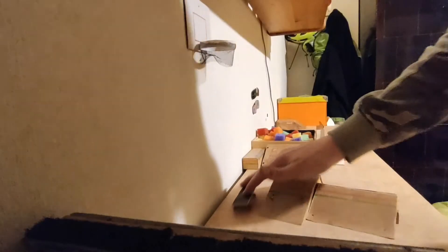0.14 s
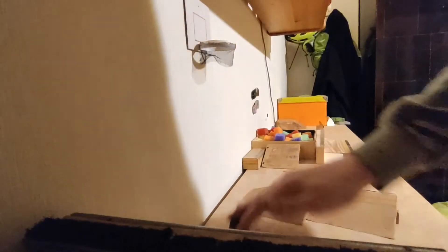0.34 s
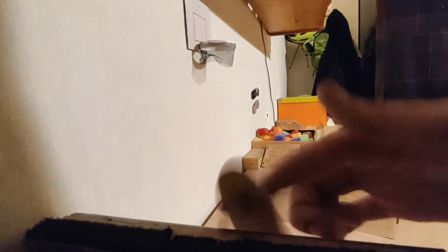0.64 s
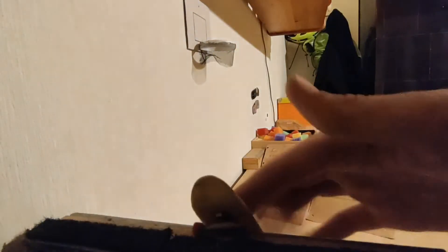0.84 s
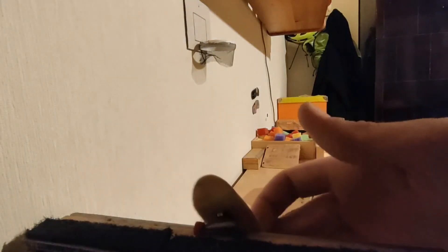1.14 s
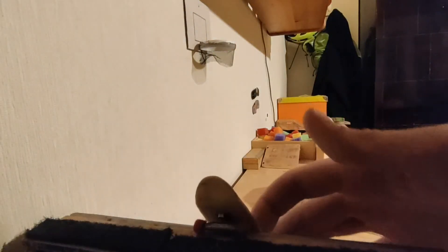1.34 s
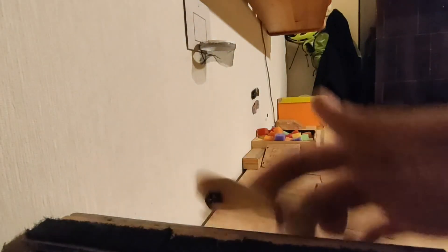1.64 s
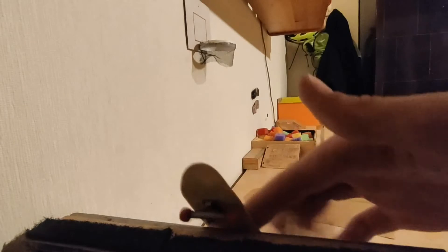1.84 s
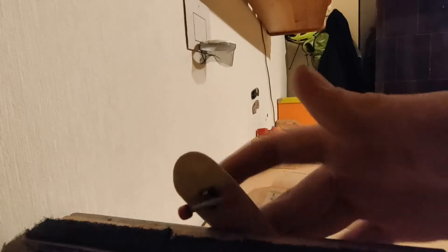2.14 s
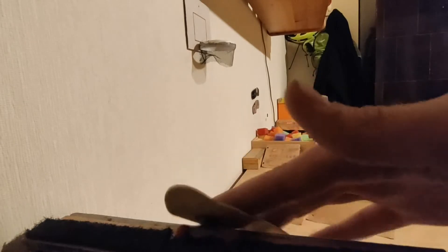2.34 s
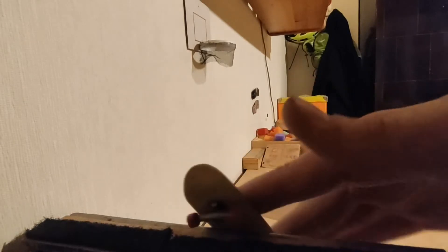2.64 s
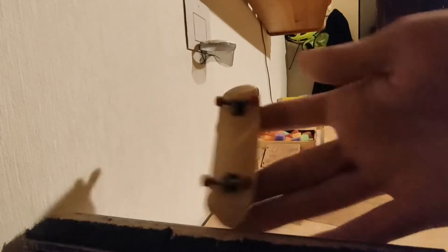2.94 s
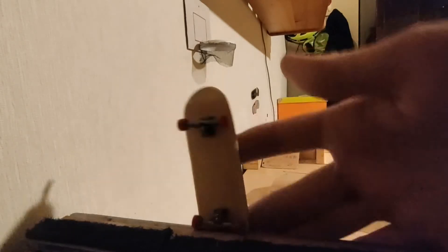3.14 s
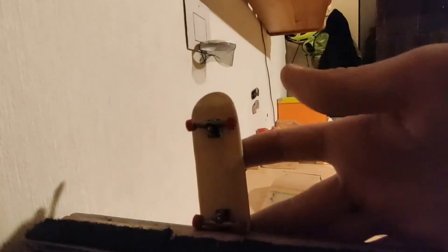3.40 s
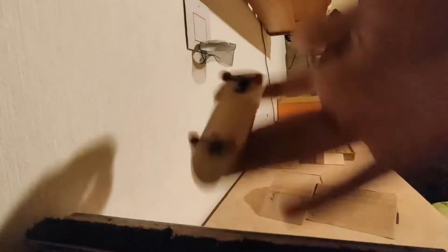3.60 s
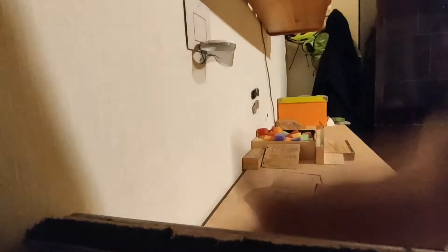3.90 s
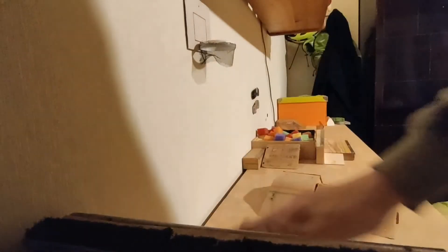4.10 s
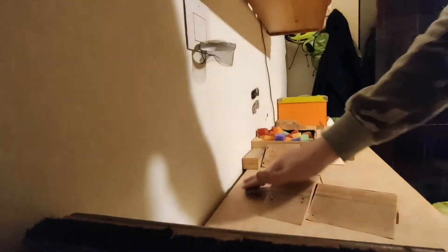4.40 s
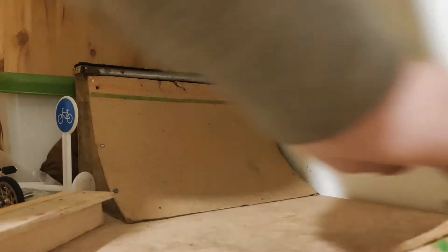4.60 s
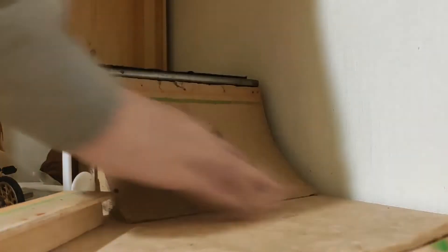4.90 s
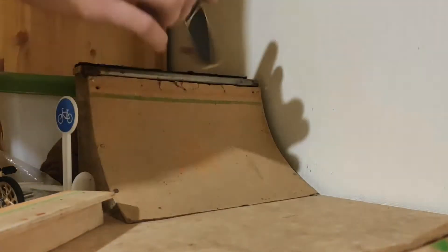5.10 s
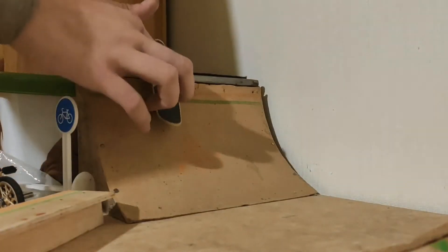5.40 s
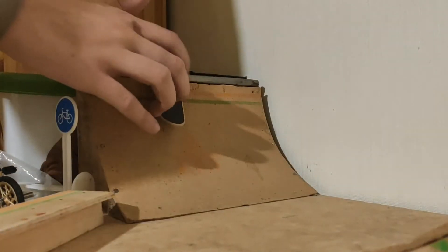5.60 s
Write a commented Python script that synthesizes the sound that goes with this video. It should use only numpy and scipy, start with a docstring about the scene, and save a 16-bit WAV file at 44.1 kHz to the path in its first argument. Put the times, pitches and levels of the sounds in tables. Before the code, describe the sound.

Close and dry in a small room: little wheels swell on wood, a hollow ramp thumps and rings briefly, and hard double knocks land on its edge. A sharp clack with a tiny metallic squeak comes midway, then only faint taps and scuffs. The sound drops out briefly before a second, shorter rolling run and a few woody knocks.

```python
"""First a rattle of small wheels swells on a table: a toy skateboard rolls towards a hollow wooden ramp, runs up,
knocks about on its edge and rolls away; after a fade it rides a second ramp.
Wood sounds by modal resonance under blows, rolling and rubbing; loose metal axles rattle as coloured random
impacts; scrapes squeak as friction noise through narrow resonances. A small room adds delayed reflections, and
two close microphone ports add slow shaking and hiss."""
import sys
import numpy as np
from scipy import signal
from scipy.fft import rfft, irfft, next_fast_len
from scipy.io import wavfile

SR = 44100
rng = np.random.default_rng(int(sys.argv[2]) if len(sys.argv) > 2 else 0)


def store_wav(level_fs):
    """Save 16-bit WAV to argv[1]."""
    pcm = np.round(np.clip(np.atleast_2d(level_fs), -1, 1) * 32767)
    wavfile.write(sys.argv[1], SR, pcm.T.astype(np.int16))


N = 253575

# Gain of the fades: (t/s, gain/1)
FADES = [(0, 0), (0.08, 1), (4.3, 1), (4.56, 0.37), (4.6, 0), (4.65, 1)]
# Shaking of the microphone by the table: (t/s, level/dB)
RUMBLE = [(0, -58), (0.35, -56), (0.93, -58), (2.0, -60), (3.4, -69), (3.96, -78), (4.03, -65.5),
          (4.45, -89.5), (4.62, -68), (4.8, -61), (5.3, -50.5), (5.75, -59)]

# Rolling on the table, one curve a stretch of rolling: (t/s, relative axle drive/dB, relative wood drive/dB)
ROLL_CURVES = [
    [(0, -69, -58.5), (0.1, -54, -52.5), (0.2, -44.5, -45), (0.35, -41, -48), (0.47, -39.5, -40),
     (0.53, -38, -34.5), (0.69, -34.5, -43.5), (0.71, -65.5, -74)],
    [(4.0, -63, -63.5), (4.1, -68, -55.5), (4.17, -57.5, -56.5), (4.25, -68, -69), (4.33, -72.5, -77.5),
     (4.42, -77.5, -89.5), (4.55, -92, -96.5)],
    [(4.6, -59, -60), (4.68, -47.5, -46), (4.77, -40.5, -43.5), (4.83, -47, -47), (4.9, -39.5, -40.5),
     (4.96, -30.5, -36.5), (5.1, -40.5, -38.5), (5.2, -51.5, -67.5), (5.3, -69, -76)],
]
# Rolling drive of the wood at 200 Hz and at 1800 Hz against 600 Hz: (level/dB, level/dB)
ROLL_WOOD_DB = [-8.5, -9]
# Pitches of the table's modes: (f/Hz)
TABLE_HZ = [200, 290, 365, 525, 680, 937, 1200, 1490, 1800, 2480]
# The table's modes: (relative level/dB, t60/s, left-right level/dB, phase by which left lags/rad)
TABLE_MODES = [(-6, 0.03, 1.5, 0.056), (-7.5, 0.025, -3, .2), (2, .05, 0, .3), (0, 0.019, -1.5, 0.043),
               (2, 0.025, 2.5, .2), (-1.5, 0.012, 4.5, 0), (0.5, 0.019, 3, 0), (-2.5, .035, 2, -1.8),
               (-2, .02, 3.5, -2.4), (-6.5, .015, -1.5, -1.5)]
# Left-right balance of the table before and after the fade: (level/dB, level/dB)
TABLE_SIDE_DB = [-5, 7]

# Faint creaking of the held board: (t/s, relative level/dB)
RESTING = [(0.7, -80), (1.6, -77.5), (2.5, -76.5), (3.3, -90), (3.5, -87.5), (3.9, -99), (4.0, -99)]
# Creaking drive of the wood at 200 Hz, at 1800 Hz and of the axles, against 600 Hz: (level/dB, three times)
RESTING_DB = [10.5, 0, -1.5]
# Squeaky scrapes of metal on the ramp's edge: (t/s, half length/s, f/Hz, level/dB)
SQUEAKS = [(1.768, 0.012, 5600, -44), (2.574, 0.014, 6080, -68.5), (2.583, 0.019, 7880, -73.5),
           (2.859, 0.016, 5550, -71.5), (2.858, 0.014, 8130, -74.5), (2.977, 0.013, 5520, -50.5),
           (3.657, 0.012, 5980, -68.5)]
# Scuffs of the deck along the edge: (t/s, half length/s, relative axle drive/dB,
# relative wood drive at 200 Hz/dB, at 600 Hz/dB, at 1800 Hz/dB)
SCUFFS = [(0.777, 0.0019, -18, -15, -20, -38), (0.861, 0.027, -90, -48, -71, -54.5),
          (1.112, 0.044, -67, -44, -56, -70), (1.274, 0.018, -63.5, -43, -55, -57),
          (1.442, 0.01, -69.5, -68, -83, -65), (1.729, 0.014, -46.5, -38, -32.5, -36.5),
          (1.91, 0.022, -71, -49, -56, -52), (2.042, 0.012, -72, -49, -48.5, -62),
          (2.072, 0.018, -62, -53, -73, -76), (2.153, 0.024, -64, -60, -63, -77),
          (2.332, 0.02, -68, -46, -72.5, -79), (2.387, 0.015, -57, -60.5, -60.5, -67),
          (2.582, 0.015, -73.5, -64.5, -66, -72), (2.751, 0.024, -82, -73, -73.5, -77.5),
          (2.867, 0.031, -79.5, -67, -67.5, -80), (2.947, 0.016, -52, -40, -39.5, -50.5),
          (3.115, 0.016, -52.5, -46, -58, -61.5), (3.228, 0.031, -59, -51, -63.5, -69),
          (3.615, 0.018, -77, -64, -67, -80.5), (3.655, 0.012, -63.5, -67.5, -61.5, -67),
          (3.738, 0.021, -69, -91, -92, -80), (4.69, 0.009, -44, -69.5, -61.5, -40),
          (5.365, 0.031, -39, -42, -47.5, -46), (5.43, 0.03, -56.5, -58, -64.5, -52),
          (5.578, 0.049, -59, -50, -51.5, -58), (5.75, 0.025, -67, -63, -59, -71)]
# Lone ticks of the axles: (t/s, relative level/dB)
TICKS = [(0.5292, -9), (0.578, -11.5), (0.606, -36), (0.6325, -29), (1.121, -33), (1.1344, -36),
         (1.1445, -38), (1.1714, -32), (1.294, -35), (1.436, -55), (2.2008, -39.5), (2.21, -42),
         (2.369, -30), (2.376, -28), (2.488, -43), (2.654, -43), (2.939, -37), (2.974, -34), (3.043, -41.5),
         (3.068, -45), (3.105, -39), (3.117, -35), (3.718, -52.5), (3.7414, -42), (3.761, -47),
         (3.927, -41), (3.975, -54.5), (4.121, -60.5), (4.3108, -41), (4.7328, -17.5), (4.7739, -13),
         (4.803, -31), (4.8614, -21.5), (5.0094, -6.5), (5.0915, -19), (5.5616, -53), (5.5932, -60)]
# Colour of the axle rattle: (f/Hz, relative level per Hz/dB)
AXLE_COLOUR = [(1500, -18.5), (2600, -9.5), (3500, -2), (4600, -8.5), (5400, -5), (6500, -2), (7600, -4),
               (8800, -2), (10300, -11.5), (15100, -18.5), (15900, -23), (16500, -58.5)]
# Left-right balance of the rattle at the first and at the second ramp: (level/dB, level/dB)
AXLE_SIDE_DB = [-0.5, 1.5]

# Wheels pressed into a hollow ramp, one curve a run:
# (t/s, relative wood drive at 600 Hz/dB, level at 1800 Hz against it/dB)
RUN_CURVES = [
    [(0.525, -46, 4), (0.545, -27.5, 6.5), (0.57, -14, -4.5), (0.6, -21, -7), (0.635, -18, -6),
     (0.67, -21, 3), (0.69, -40, 1.5), (0.72, -54.5, -1)],
    [(4.005, -45, -9.5), (4.03, -39.5, -8), (4.088, -47, -15), (4.105, -62, -6.5), (4.13, -70.5, -2)],
    [(4.94, -50.5, -1), (4.985, -30, 4), (5.02, -18, -9), (5.05, -16.5, -3.5), (5.08, -19, 0),
     (5.108, -35.5, 10.5), (5.15, -33.5, -2), (5.22, -57, 5.5), (5.28, -65.5, 4)],
]
# One mode of the wood ringing out, under a rolling wheel or after a blow: (t/s, half length/s, f/Hz, level/dB)
SINGS = [(0.561, 0.0047, 1387, -18), (0.58, 0.016, 428, -15), (0.6, 0.0071, 707, -13),
         (0.626, 0.014, 1500, -21.5), (0.643, 0.0071, 700, -9.5), (0.661, 0.0034, 680, -10.5),
         (0.834, 0.014, 199.9, -32), (1.842, .008, 371, -23.5), (1.876, 0.022, 198, -23),
         (2.043, 0.018, 601, -41), (2.284, 0.0049, 649, -50), (2.32, 0.0081, 371, -43),
         (2.957, 0.0091, 580, -35.5), (4.994, 0.0068, 1812, -19), (5.019, 0.0048, 540, -12.5),
         (5.036, 0.003, 600, -6), (5.055, 0.0031, 1280, -8.5), (5.074, 0.0065, 576, -4),
         (5.09, 0.0045, 2050, -15), (5.121, 0.0044, 720, -18.5)]
# Blows on the wood: (t/s, relative axle drive/dB, relative wood drive at 200 Hz/dB, at 600 Hz/dB,
# at 1800 Hz/dB, t60 of the axle chatter/s)
BLOWS = [(0.7068, -7.5, -19.5, -4, -9.5, 0.051), (0.7755, -7, -12.5, -22, -24, 0.065),
         (0.7835, -7.5, -45, -3, -2, 0.028), (0.8053, -26.5, -10, -19, -21, 0.14),
         (0.9798, -66, -39.5, -44, -63, 0.043), (1.062, -11, -9, -12.5, -4.5, 0.031),
         (1.0746, -18, -65, -43, -68, 0.027), (1.2169, -29.5, -26.5, -32, -33, 0.075),
         (1.231, -28.5, -30, -22.5, -34.5, 0.045), (1.261, -35, -44, -36, -53, 0.057),
         (1.3802, -58, -35.5, -51, -58, 0.07), (1.722, -11, -38, -20, -22, 0.02),
         (1.7468, -4.5, -18.5, -13.5, -10.5, 0.023), (1.8193, -9, -19, -11.5, -14.5, 0.098),
         (1.8392, -34, -16, -18, -29, 0.031), (1.8618, -16, -12, -11.5, -12.5, 0.058),
         (1.8787, -61, -22, -49, -25, 0.061), (2.0877, -27, -20, -23.5, -30, 0.022),
         (2.089, -41, -26, -106, -77.5, 0.044), (2.2783, -40, -56, -43, -72, 0.018),
         (2.3101, -32.5, -40, -40.5, -37, 0.022), (2.317, -32.5, -36, -54, -68, 0.025),
         (2.6616, -39.5, -48, -32.5, -30.5, 0.097), (2.6693, -25, -24.5, -31, -34.5, 0.026),
         (2.961, -19.5, -60, -36, -29.5, 0.027), (3.0833, -45.5, -25, -26.5, -38, 0.037),
         (3.1057, -52.5, -39.5, -58.5, -59.5, 0.035), (3.2252, -23.5, -60, -74, -38, 0.041),
         (3.233, -32, -32, -26, -29, 0.039), (3.3798, -65, -45.5, -63, -80.5, 0.039),
         (4.007, -22.5, -31.5, -32.5, -24, 0.035), (4.085, -54.5, -50, -30, -46, 0.032),
         (4.9642, -22.5, -42, -16, -18, 0.018), (5.1185, -8.5, -49, 1, -12.5, 0.027),
         (5.2712, -26.5, -62, -60, -33.5, 0.027), (5.3132, -2.5, -22, -6, -72, 0.062),
         (5.3267, -19.5, -24, -16, -13.5, 0.13), (5.4138, -19.5, -51, -12.5, -27, 0.044),
         (5.4238, -40, -28, -12, -25.5, 0.041), (5.5404, -35, -58, -24.5, -35.5, 0.054),
         (5.6174, -53, -57, -23.5, -34.5, 0.02)]
# Pitches of the two ramps' modes: (f/Hz)
FIRST_HZ = [150, 199, 240, 371, 428, 532, 668, 700, 762, 899, 1155, 1325, 1505, 1680, 1885, 2020, 2330,
            2600, 3100]
SECOND_HZ = [160, 230, 340, 440, 515, 576, 667, 775, 1040, 1293, 1620, 1825, 2015, 2480, 2700, 3130]
# The two ramps' modes: (relative level/dB, t60/s, left-right level/dB, phase by which left lags/rad)
FIRST_RAMP_MODES = [(-13, 0.032, -2.5, 0.5), (0.5, 0.074, -1.5, 0.07), (-4, .05, -6.5, 0.32),
                    (3, 0.038, -3.5, -0.47), (-2, 0.041, -6, 2), (-1.5, 0.036, -6.5, 0.54),
                    (1, 0.023, -7.5, -0.3), (0, 0.024, -7, 0.82), (-12, 0.029, -7, 4), (-7, 0.043, 0.5, -3),
                    (2, 0.065, 0, 2.5), (-3.5, .04, 0, 1.05), (-2, 0.015, 3, -5), (-6, 0.025, -2, 1),
                    (-6, 0.04, 0.5, 1.06), (-10, 0.015, -3.5, 1), (-10.5, .02, -0.5, 0.5),
                    (-4.5, 0.0093, 1.5, -5), (-5, .01, -2.5, 2)]
SECOND_RAMP_MODES = [(-6, 0.11, 10.5, -1), (4, 0.046, 4.5, 0.87), (-7, 0.049, 4, 0.8), (-14, 0.1, -8, 0),
                     (-18, 0.04, 4.5, -3), (0.5, 0.024, 6, -0.6), (-6, 0.037, 17, -1),
                     (-6.5, 0.083, 4, -0.2), (-1, 0.015, 0.5, 5.5), (-7, 0.021, 13, 3),
                     (-4.5, 0.011, -12, 0), (-3, 0.026, 8, 3.5), (0, 0.014, 1, 1.5), (-1, 0.013, 3, 0.84),
                     (-15.5, 0.071, -7, -2), (-16.5, 0.009, -13, -3)]

SECOND_FROM_S = 4.58    # from here the second ramp sounds
HISS_DB, CUTOFF_HZ = -93, 16800
ROOM_T60_S, WALL_CUT_HZ, ROOM_DB = 0.37, 13000, -21
SQUEAK_WIDTH_HZ = 45
TICK_T60_S, TICK_CUT_HZ = 0.015, 8000    # a lone tick is thin
RUN_LOW_DB, RUN_AXLE_DB = -32.5, -25.5    # wood at 200 Hz and axles, against the wood at 600 Hz
SING_SIDE_DB, SING_LAG_RAD = 1.5, 0.32    # left-right level, phase by which left lags
RISE_S = 0.0011
WOOD_BLOW_SHARE = 0.7    # the wood's contact dies in this share of the axle chatter's t60
SETTLE_DB, SETTLE_T60_S = -36, 0.4    # faint, slow shivering of the board after a blow
WOOD_CUT_HZ = 98


def amp(db):
    """The decibel law: level to amplitude ratio."""
    return 10 ** (np.asarray(db) / 20)


def rms_one(x):
    """Normalisation to unit rms."""
    return x / np.sqrt(np.mean(x ** 2) + 1e-20)


def in_time(rows):
    """Linear interpolation of curve columns at every sample."""
    s, *columns = np.transpose(rows)
    t = np.arange(N) / SR
    return np.array([np.interp(t, s, column) for column in columns])


def during(rows):
    """Gating: curve columns and a gate open from the first row to the last."""
    t = np.arange(N) / SR
    return in_time(rows), (t >= rows[0][0]) & (t <= rows[-1][0])


def swell(s, half_s):
    """A Gaussian envelope about one moment."""
    t = np.arange(N) / SR
    return np.exp(-.5 * ((t - s) / half_s) ** 2)


def at_hz(points, hz):
    """Interpolation of a spectrum on a logarithmic frequency axis."""
    f, level_db = np.transpose(points)
    return np.interp(np.log(hz + 1), np.log(f), level_db)


def drift(rate_hz):
    """Low-pass filtered chance: coarse noise through a double pole wanders slowly, with rms 1."""
    step = 32    # samples between coarse values
    r = np.exp(-2 * np.pi * step * rate_hz / SR)
    noise = rng.standard_normal(N // step + 1002)
    slow = signal.lfilter([1], [1, -2 * r, r * r], noise)[1000:]
    return np.interp(np.arange(N) / step, np.arange(len(slow)), rms_one(slow))


def grit(per_s, spread_db):
    """A random impulse process: tiny knocks of uneven size and either sign, with rms 1."""
    sizes = amp(spread_db * np.minimum(rng.exponential(1, N), 5))
    signs = rng.choice([-1, 1], N)
    return rms_one(sizes * signs * (rng.random(N) < per_s / SR))


def burst(t60):
    """Exponential build-up and decay of a contact, with a faint shiver; cut after a quarter second."""
    t = np.arange(SR // 4) / SR
    decay = amp(-60 * t / max(t60, .004))
    shiver = amp(SETTLE_DB - 60 * t / SETTLE_T60_S)
    return (1 - np.exp(-t / RISE_S)) * (decay + shiver)


def sides(balance_db, second):
    """Stereo balance by level difference, split evenly in dB between left and right."""
    return np.where(second, balance_db[1], balance_db[0]) * np.array([[.5], [-.5]])


def hiss():
    """White noise of the microphone, independent at the two ports."""
    return amp(HISS_DB) * rng.standard_normal((2, N))


def rumble():
    """Band-limited vibration: slow shaking, mostly each port's own."""
    band = signal.butter(2, [15, 60], "band", fs=SR, output="sos")
    shake = signal.sosfilt(band, rng.standard_normal((3, N)))
    ports = shake[:2] + 0.8 * shake[2]
    return amp(in_time(RUMBLE)) * rms_one(amp(3.0 * drift(4)) * ports)


def room(x):
    """Recirculating reflection: eight feedback delays a side, duller on every round."""
    size = next_fast_len(N + SR)
    w = 2 * np.pi * np.fft.rfftfreq(size)
    dull = 1 / (1 + 1j * w * SR / (2 * np.pi * WALL_CUT_HZ))
    tail = np.zeros((2, len(w)), complex)
    for k, lag in enumerate(rng.uniform(.006, 0.028, 16) * SR):
        loop = amp(-60 * lag / SR / ROOM_T60_S) * dull * np.exp(-1j * w * round(lag))
        tail[k % 2] += loop / (1 - loop) * (-1) ** (k // 2)
    late = irfft(rfft(x, size) * tail, size)[:, :N]
    # the bass comes straight through the table
    return signal.lfilter(*signal.butter(2, 260, "high", fs=SR), late)


def rolling():
    """Rolling excitation by the table: drive of the wood at 200, 600 and 1800 Hz and of the axles."""
    drive = np.zeros((4, N))
    low_db, high_db = ROLL_WOOD_DB
    for rows in ROLL_CURVES:
        (axle_db, wood_db), on = during(rows)
        drive += on * amp([wood_db + low_db, wood_db, wood_db + high_db, axle_db])
    return drive


def squeaks():
    """Resonant filtering of friction: each squeak is noise swelling through one narrow resonance."""
    out = np.zeros((2, N))
    r = np.exp(-np.pi * SQUEAK_WIDTH_HZ / SR)
    for s, half_s, hz, level_db in SQUEAKS:
        poles = [1, -2 * r * np.cos(2 * np.pi * hz / SR), r * r]
        tone = signal.lfilter([1, 0, -1], poles, rng.standard_normal((2, N)))
        out += amp(level_db) * rms_one(tone) * swell(s, half_s)
    return out


def axles(drive, apart):
    """Filtered random impacts: loose axles and bearings rattle through the deck's broad colour."""
    size = next_fast_len(N + 4096)
    log_gain = np.log(amp(at_hz(AXLE_COLOUR, np.fft.rfftfreq(size, 1 / SR))))
    cepstrum = irfft(log_gain, size)[:size // 2 + 1]
    cepstrum[1:-1] *= 2    # folding makes the colour causal
    colour = np.exp(rfft(cepstrum, size))
    colour /= np.sqrt(np.mean(abs(colour) ** 2))

    def ring(knocks):
        """Convolution of the driven knocks with the colour."""
        return irfft(rfft(knocks * drive, size) * colour, size)[:N]

    shared, own = grit(9000, spread_db=2.0), grit(6000, spread_db=3.5)
    # the second part has opposite sign at the two ports
    return ring(shared) + apart * ring(own) * np.array([[1], [-1]])


def ticks():
    """High-passed short impacts: lone thin ticks of the axles."""
    envelope = np.zeros(N + SR)
    for s, level_db in TICKS:
        envelope[round(s * SR):][:SR // 4] += amp(level_db - 2.5) * burst(TICK_T60_S)
    thin = signal.butter(2, TICK_CUT_HZ, "high", fs=SR, output="sos")
    return signal.sosfilt(thin, axles(envelope[:N], apart=.9))


def patchy(x, spread_db):
    """Independent band modulation: each band of the rattle swells and sinks on its own."""
    edges = [300, 3500, 5500, 7500, 10000, 17000]    # Hz
    out = 0
    for pair in zip(edges, edges[1:]):
        band = signal.sosfilt(signal.butter(2, pair, "band", fs=SR, output="sos"), x)
        out = out + band * amp(spread_db * drift(31))
    return out


def sings():
    """Single-mode ringing: short swelling sine tones of the wood."""
    out, t = np.zeros((2, N)), np.arange(N) / SR
    side = np.array([[.5], [-.5]])
    for (s, half_s, hz, level_db), start in zip(SINGS, rng.random(len(SINGS))):
        tone = np.sin(2 * np.pi * (hz * t + start) - SING_LAG_RAD * side)
        out += amp(level_db + SING_SIDE_DB * side) * tone * swell(s, half_s)
    return out


def rubbing():
    """Sustained contact excitation: drive of the wood at 200, 600 and 1800 Hz and of the axles."""
    drive = np.zeros((4, N))
    for rows in RUN_CURVES:
        (wood_db, bright_db), on = during(rows)
        drive += on * amp([wood_db + RUN_LOW_DB, wood_db, wood_db + bright_db, wood_db + RUN_AXLE_DB])
    (rest_db,), on = during(RESTING)
    low_db, high_db, axle_db = RESTING_DB
    drive += on * amp([rest_db + low_db, rest_db, rest_db + high_db, rest_db + axle_db])
    for s, half_s, axle_db, *wood_db in SCUFFS:
        drive += amp([*wood_db, axle_db])[:, None] * swell(s, half_s)
    return drive


def blows():
    """Impact excitation: a first firm push on the wood, then envelopes of loose chatter."""
    push, loose = np.zeros((3, N)), np.zeros((4, N + SR))
    for s, axle_db, low_db, body_db, high_db, t60 in BLOWS:
        push[:, round((s + RISE_S) * SR)] = amp([low_db + 16.5, body_db + 6.5, high_db + 4])
        span = loose[:, round(s * SR):][:, :SR // 4]
        wood_gain = amp([[low_db - 19.5], [body_db - 4.5], [high_db - 5.5]])
        span[:3] += wood_gain * burst(WOOD_BLOW_SHARE * t60)
        span[3] += amp(axle_db - 9) * burst(t60)
    return push, loose[:, :N]


def wood(push, drive, pitches, modes, per_s=2500, spread_db=3.5):
    """Modal superposition: each mode takes the force at its pitch and reaches each port in its own way."""
    out = 0
    knocks = [grit(per_s, spread_db), grit(per_s, spread_db)]
    for k, (hz, (level_db, t60, lean_db, lag)) in enumerate(zip(pitches, modes)):
        # shares of the forces given at 200, 600 and 1800 Hz
        place = np.interp(np.log(hz), np.log([200, 600, 1800]), [0, 1, 2])
        share = np.maximum(1 - abs(place - np.arange(3)), 0)
        wander = amp(1.5 * drift(9))    # the contact moves over the mode's nodes
        force = (share @ push + share @ drive * knocks[k % 2]) * wander + 1e-18
        # a mode radiates little below its pitch
        force = signal.lfilter(*signal.butter(2, 0.71 * hz, "high", fs=SR), force)
        r = amp(-60 / (max(t60, .005) * SR))
        # the root evens out the level of steady ringing whatever the decay
        gain = amp(level_db - 3.5) * np.sqrt(2 * (1 - r * r))
        phasor = signal.lfilter([gain], [1, -r * np.exp(2j * np.pi * hz / SR)], force)
        half = amp(lean_db / 2) * np.exp(-.5j * lag)
        out = out + np.imag(phasor * np.array([[half], [1 / half]]))
    # small boards radiate no bass
    return signal.sosfilt(signal.butter(4, WOOD_CUT_HZ, "high", fs=SR, output="sos"), out)


def scene():
    """Superposition of both rides near the ports, the room, the shaking table and the hiss."""
    second = np.arange(N) > SECOND_FROM_S * SR
    rolls = rolling() * amp(1.18 * drift(50))    # the table is smoother than the ramps
    table = wood(np.zeros((3, N)), rolls[:3], TABLE_HZ, TABLE_MODES, per_s=6000, spread_db=2.5)
    table = amp(sides(TABLE_SIDE_DB, second)) * table

    push, loose = blows()
    bumps = amp(2.0 * drift(57))    # the wheels bump over the wood's grain
    drive = rubbing() * bumps + loose
    rattle = patchy(axles(drive[3] + rolls[3], apart=0.99) + ticks(), spread_db=3.5)
    rattle = amp(sides(AXLE_SIDE_DB, second) + 3.0) * rattle

    first_wood = wood(push * ~second, drive[:3] * ~second, FIRST_HZ, FIRST_RAMP_MODES)
    second_wood = wood(push * second, drive[:3] * second, SECOND_HZ, SECOND_RAMP_MODES)
    near = table + squeaks() + rattle + sings() + first_wood + second_wood
    return near + amp(ROOM_DB) * room(near.mean(axis=0)) + rumble() + hiss()


def record(dry):
    """Saturation and band limiting: peaks are rounded, the top is cut, then the fades apply."""
    rounded = .8 * np.tanh(dry / .8)
    top_cut = signal.cheby2(12, 70, CUTOFF_HZ, fs=SR, output="sos")
    return signal.sosfilt(top_cut, rounded) * np.clip(in_time(FADES), 0, 1)


dry = scene()
out = record(dry)
store_wav(out)
```